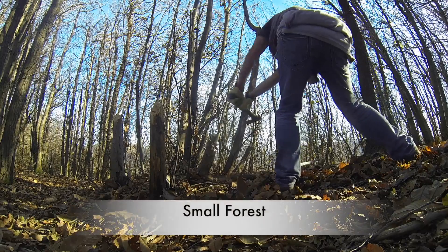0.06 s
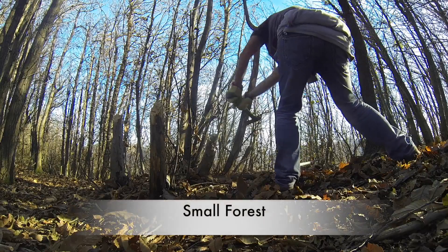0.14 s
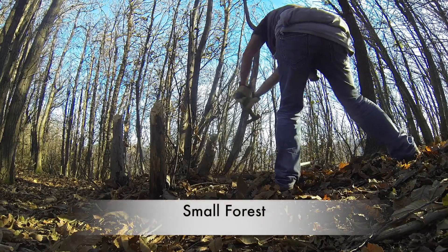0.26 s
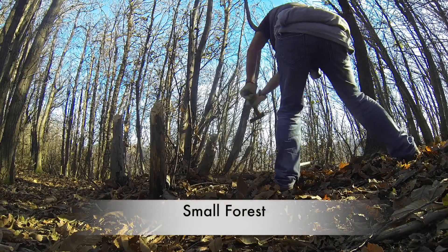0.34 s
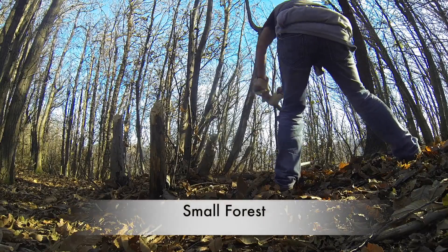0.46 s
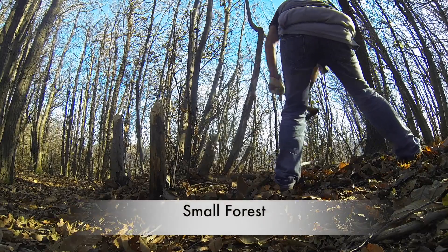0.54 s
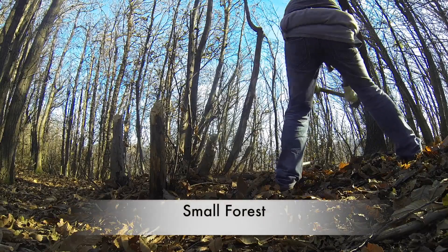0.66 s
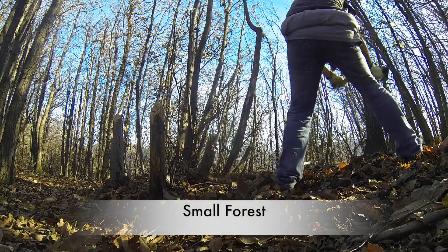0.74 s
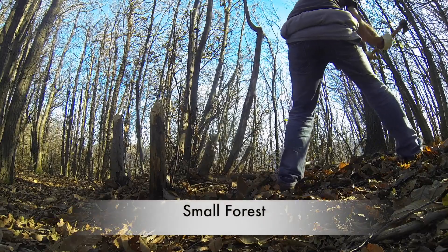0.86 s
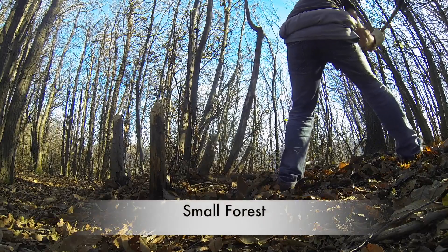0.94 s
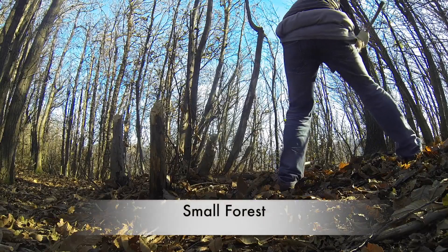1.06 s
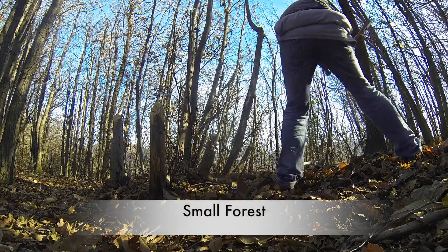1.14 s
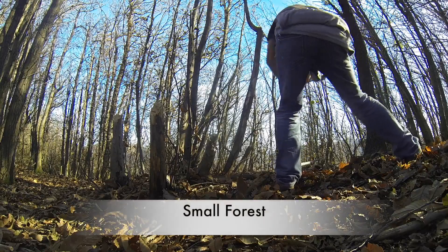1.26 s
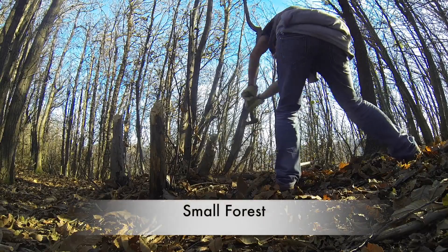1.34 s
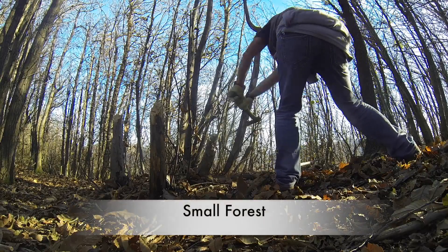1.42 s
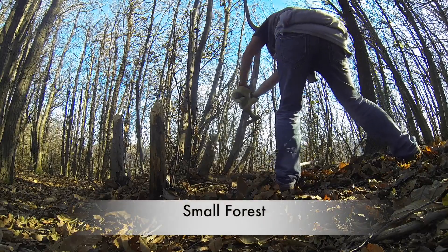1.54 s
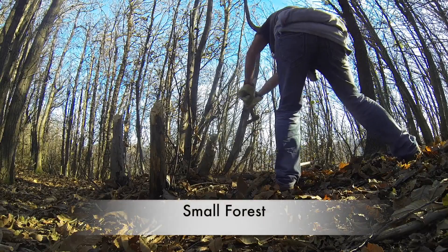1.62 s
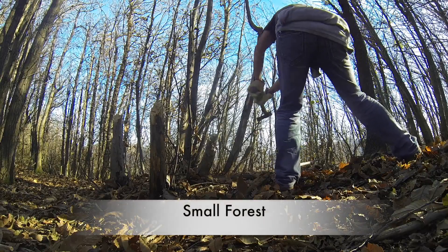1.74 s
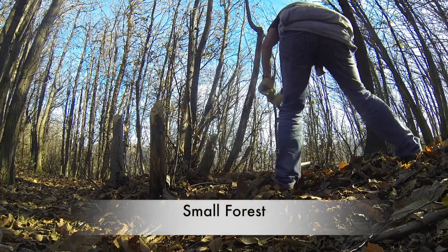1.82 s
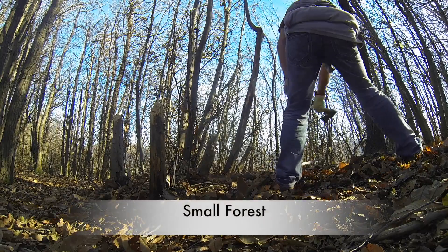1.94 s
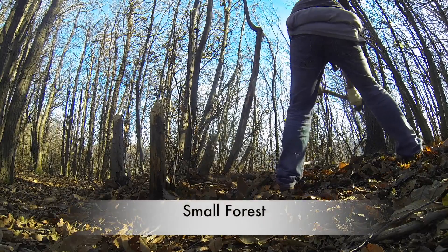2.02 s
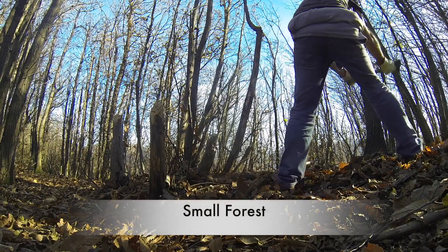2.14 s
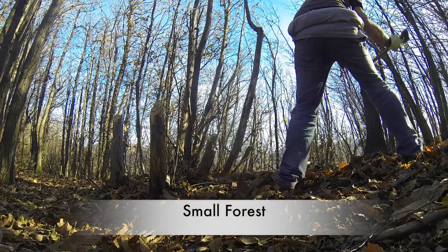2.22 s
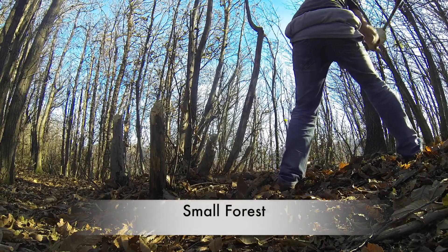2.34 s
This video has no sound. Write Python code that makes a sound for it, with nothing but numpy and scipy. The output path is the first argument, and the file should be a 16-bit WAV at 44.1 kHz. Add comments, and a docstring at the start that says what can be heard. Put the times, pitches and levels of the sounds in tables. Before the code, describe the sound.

An axe strikes a thin trunk twice, woody cracks with low thumps, leaves rustling in quiet woods

```python
"""Axe blows in a quiet wood

Two axe blows hit a thin standing trunk a few metres away. Each is a short woody crack (fading tones
and noise), then a low thump of trunk and roots with a rebound, and noise scattered by the trees.
Around them dry leaves rustle (swelling noise full of tiny clicks) and snap (short noise bursts)
under shifting feet, and wood is faintly knocked. Below lie a low rumble, a hiss and a thin whine."""
import sys
import numpy as np
from scipy import signal
from scipy.fft import rfft, irfft, next_fast_len
from scipy.io import wavfile
from scipy.ndimage import map_coordinates

SR = 44100
rng = np.random.default_rng(int(sys.argv[2]) if len(sys.argv) > 2 else 0)


def amplitude_ratio(level_db):
    """Convert a level in decibels to the matching linear amplitude (field) ratio."""
    exponent = np.asarray(level_db, float) / 20
    return 10 ** exponent


def bounce(signal):
    """Save signal as a 16-bit WAV file at the path given by the first command-line argument."""
    frames = np.transpose(np.atleast_2d(signal))
    limited = np.clip(frames, -1, 1)
    pcm = np.round(limited * 32767).astype(np.int16)
    wavfile.write(sys.argv[1], SR, pcm)


N = 105840  # length of the scene in samples (2.4 s)

# Colours of the distant rumble and the air hiss: (frequency [Hz], relative level [dB per Hz])
RUMBLE_COLOUR = [(12, -32), (20, 13), (38, -1.5), (71, 3), (119, -8), (195, -4.5), (251, -10.5),
                 (369, -19.5), (700, -32.5), (910, -30.5), (1540, -120)]
HISS_COLOUR = [(240, -44), (400, 2), (536, -6.5), (1010, -3), (1420, -8.5), (5190, -13.5), (9040, -12),
               (13100, -20), (14600, -14), (16000, -56)]
RUMBLE_DB, HISS_DB = -49, -63.5  # levels before the microphone
WHINE_HZ, WHINE_DB = 14100, -79  # a very narrow band of noise, level before the microphone

# Feet shifting in the leaves:
# (time of peak [s], treble level [dB], lower part over the treble [dB], rise [s], fall [s])
SHIFTS = [(.14, -71, -2, 0.07, 0.076), (0.329, -59, 5.5, 0.024, 0.047), (.46, -61.5, -2, 0.032, 0.06),
          (.56, -65, -1.5, .03, 0.047), (0.634, -52.5, -1, 0.022, 0.018),
          (0.671, -50.5, -1.5, 0.011, 0.036), (0.779, -57.5, -2, 0.063, 0.077),
          (.94, -64, -3, 0.061, 0.062), (1.07, -56.5, -5.5, 0.038, 0.026), (1.40, -70, -5, 0.028, 0.093),
          (1.60, -53.5, -10, 0.088, 0.063), (1.745, -61.5, 3, 0.025, 0.014), (1.86, -58, 1, 0.016, 0.12),
          (2.025, -55, -1, 0.027, 0.072), (2.2, -62.5, -0.5, 0.075, 0.052), (2.31, -69, -1.5, 0.027, 0.055)]
# Colours of the treble and the lower part of the rustle: (frequency [Hz], relative level [dB per Hz])
LEAF_HIGH_COLOUR = [(2060, -8), (3500, -25), (5430, -3), (7040, 5), (9870, -0.5), (14500, -24),
                    (15600, -47), (16000, -62)]
LEAF_LOW_COLOUR = [(210, -42), (350, -4.5), (624, -17), (1260, -14.5), (1490, -16), (5000, -19),
                   (6500, -68), (11000, -120)]
STIR_DB = -70  # the leaves between the shifts
GRAINS_PER_S, GRAIN_SPREAD_DB, GRAIN_DB = 1500, 2.5, -2  # average rate, spread, level over the noise

# Snaps of leaves and twigs:
# (time [s], relative level [dB], centre frequency [Hz], width [octaves], length [s])
SNAPS = [(0.209, -20, 7400, .5, .002), (0.321, -39, 7500, 1, 0.0064), (.423, -39.5, 8030, .9, .002),
         (.4443, -49.5, 2640, 0.95, 0.0091), (0.558, -45, 7000, 0.55, 0.0035),
         (0.649, -42, 5000, 2.2, 0.0045), (0.665, -39, 5000, 4.2, 0.0089),
         (0.7703, -36.5, 4320, 0.65, 0.003), (0.77, -37.5, 8300, 0.42, 0.0042),
         (0.8684, -50, 2360, 1.1, 0.0028), (.9846, -46.5, 9100, 0.46, 0.0033),
         (1.053, -51.5, 8000, 0.64, 0.0035), (1.080, -43.5, 9000, 0.56, 0.003),
         (1.2714, -48, 1530, 0.94, 0.0033), (1.272, -48, 8450, .5, 0.0046), (1.5325, -23, 7000, .3, .002),
         (1.495, -46, 1500, .8, 0.0035), (1.62, -40, 1190, 1.8, 0.012), (1.722, -52, 7950, 0.51, 0.0028),
         (1.747, -51, 8780, .8, .004), (1.954, -46, 8300, .8, .005), (2.103, -39, 7250, 0.77, 0.0047),
         (2.1024, -44.5, 2800, 0.69, .006), (2.137, -50, 2000, 1.5, 0.0022),
         (2.1966, -49, 1700, 0.68, 0.0026), (2.231, -45.5, 1190, 1.7, 0.0029),
         (2.283, -47.5, 3500, 0.7, 0.0024), (2.322, -53, 2400, .6, 0.0075)]

# A faint double knock on wood, each contact: (time [s], level [dB])
KNOCKS = [(1.0657, -42.5), (1.069, -59), (1.078, -42.5), (1.0806, -48)]
# The tones that the knocked wood rings with: (frequency [Hz], level [dB], time to fade by 60 dB [s])
KNOCK_WOOD = [(294, -1, 0.075), (909, 0, 0.045), (1340, -4.5, 0.034), (1710, -2.5, 0.038),
              (2685, 1.5, 0.018)]

# Axe blows: (time [s], level of the blow [dB], splinter noise over it [dB], thump over it [dB],
# delay of the rebound [s], rebound over the thump [dB])
BLOWS = [(.1888, -2.5, -2.5, -7.5, .106, -12), (1.5180, -3.5, 0, -7, .108, -14.5)]
# Tones of wood and blade at the cut: (frequency [Hz], level in first blow [dB],
# level in second blow [dB], rise [s], time to fade by 60 dB [s])
CUT_TONES = [(587, -19.5, -8.5, 0.0033, .06), (864, -11.5, -11.5, .003, .05),
             (1147, 7, -20.5, 0.0032, 0.029), (1935, 10, 0, 0.00069, 0.011),
             (2442, -5.5, -4.5, 0.0013, .016), (3114, -1.5, -2.5, 0.001385, 0.02),
             (4270, -19, -8.5, 0.0013, 0.012), (5840, -23.5, -23.5, 0.0018, 0.048),
             (6850, -19, -4.5, 0.0014, 0.017), (7750, 16, -9, .003, 0.0091),
             (8700, -2.5, -9.5, 0.0016, 0.016)]
# Tones of trunk and roots: (frequency [Hz], level in first blow [dB], level in second blow [dB],
# time to fade by 60 dB [s])
TRUNK_TONES = [(68.3, -4.5, -3, 0.2), (94.83, -12.5, -14, 0.75), (134.8, -8, -4.5, .25),
               (169, -9.5, -3.5, 0.079), (229.3, -9, -11, .2), (316.6, -7.5, -6, 0.095),
               (394, -18.5, -17.5, 0.14), (566, -17, -17.5, 0.11)]
# Colour of the tearing fibres: (frequency [Hz], relative level [dB per Hz])
SPLINTER_COLOUR = [(290, -35.5), (500, -11), (649, -6.5), (1180, -2.5), (1440, -17), (1870, -4),
                   (2690, -11.5), (3110, -9), (5240, -18.5), (7860, -13.5), (9920, -15), (16000, -53.5)]
SPLINTER_RISE_S, SPLINTER_T60_S = 0.00074, 0.029
# How long the sound scattered by the trees lasts: (frequency [Hz], time to fade by 60 dB [s])
TREE_FADES = [(300, 0.21), (1000, 0.31), (3000, 0.32), (8000, 0.3), (14000, 0.14)]
# Colour of the scattered sound: (frequency [Hz], relative level [dB per Hz])
SCATTER_COLOUR = [(180, -16), (300, -2), (360, -2), (774, -19), (1170, -11), (1930, -20), (7440, -22),
                  (13300, -37.5), (16000, -78.5)]
TREES_DB = -23  # over the blow
THUMP_LAG_S, THUMP_RISE_S = 0.0078, 0.0006
SHUDDER_DB, SHUDDER_T60_S = -19, 0.41  # level over the thump
PUSH_DB, PUSH_WIDTH_S = 4, 0.0013  # the trunk's first jolt, level over the thump

MIC_LOW_HZ, MIC_HIGH_HZ = 48, 11500


def unit(x):
    """Scale a sound to an rms (average strength) of 1."""
    return x / np.sqrt(np.mean(x ** 2) + 1e-20)


def along(points, hz):
    """Read a curve of (frequency [Hz], value) points, joined on a log frequency axis."""
    f, v = np.transpose(points)
    return np.interp(np.log(hz + 1), np.log(f + 1), v)


def coloured(x, spectrum):
    """Shape a sound with a (frequency [Hz], level [dB]) curve, then scale it to rms 1."""
    size = next_fast_len(len(x) + 4096)
    gain = amplitude_ratio(along(spectrum, np.fft.rfftfreq(size, 1 / SR)))
    return unit(irfft(rfft(x, size) * gain, size)[:len(x)])


def noise(length, spectrum):
    """Steady noise of the given colour, rms 1."""
    return coloured(rng.standard_normal(length), spectrum)


def wobble(rate):
    """A smooth random curve with this many random points a second."""
    knots = rng.standard_normal(int(N * rate / SR) + 4)
    return map_coordinates(knots, [np.arange(N) * rate / SR])


def swell(t, rise, t60):
    """A loudness curve that rises, then fades by 60 dB every t60 seconds; silent before zero."""
    t = np.maximum(t, 0)
    return (1 - np.exp(-t / rise)) ** 2 * amplitude_ratio(-60 * t / t60)


def add(out, s, x):
    """Mix x into out, starting at s seconds."""
    part = out[round(s * SR):][:len(x)]
    part += x[:len(part)]


def forest():
    """The quiet wood: a slowly wavering distant rumble, air hiss and a thin high whine, all noise."""
    rumble = amplitude_ratio(RUMBLE_DB + 1.3 * wobble(3.4)) * noise(N, RUMBLE_COLOUR)
    hiss = amplitude_ratio(HISS_DB) * noise(N, HISS_COLOUR)
    narrow = [(WHINE_HZ - 150, -60), (WHINE_HZ, 0), (WHINE_HZ + 150, -60)]
    whine = amplitude_ratio(WHINE_DB) * noise(N, narrow)
    return rumble + hiss + whine


def crackling_noise():
    """Smooth noise plus many tiny clicks of random strength, as from dry leaves rubbing."""
    clicks = (rng.random(N) < GRAINS_PER_S / SR) * rng.standard_normal(N)
    clicks = clicks * amplitude_ratio(GRAIN_SPREAD_DB * rng.exponential(size=N))
    return rng.standard_normal(N) + amplitude_ratio(GRAIN_DB) * unit(clicks)


def leaves():
    """Leaves rub and crackle: noise and clicks in two bands swell with each shift of the feet."""
    t = np.arange(N) / SR
    bumps = []
    for s, db, _, rise, fall in SHIFTS:
        width = np.where(t < s, rise, fall)
        bumps.append(amplitude_ratio(db) * np.exp(-((t - s) / width) ** 2))
    bumps = np.array(bumps)
    lower = amplitude_ratio([row[2] for row in SHIFTS])
    high_level = (amplitude_ratio(STIR_DB) + bumps.sum(axis=0)) * amplitude_ratio(2.8 * wobble(64))
    low_level = (amplitude_ratio(STIR_DB) + lower @ bumps) * amplitude_ratio(1.5 * wobble(50))
    high = high_level * coloured(crackling_noise(), LEAF_HIGH_COLOUR)
    low = low_level * coloured(crackling_noise(), LEAF_LOW_COLOUR)
    return high + low


def snaps():
    """Leaves and twigs break suddenly: short noise bursts around a centre frequency."""
    out, t = np.zeros(N), np.arange(2048) / SR
    for s, db, hz, octaves, length in SNAPS:
        # one width away from the centre the noise is 12 dB weaker
        band = [(min(hz * 2 ** (octaves * u), 21000), -12 * u * u) for u in (-3, -2, -1, 0, 1, 2, 3)]
        shape = (1 - np.exp(-t / 0.0006)) * np.exp(-(t / length) ** 2)
        add(out, s, amplitude_ratio(db - 1.5) * noise(len(t), band) * shape)
    return out


def knock():
    """Light contacts ring a small piece of wood: fading tones, each a little stronger or weaker."""
    out, t = np.zeros(N), np.arange(SR // 8) / SR
    for s, db in KNOCKS:
        for hz, level, t60 in KNOCK_WOOD:
            strength = amplitude_ratio(db + level + rng.normal(0, 2.1))
            add(out, s, strength * swell(t, 0.00034, t60) * np.sin(2 * np.pi * hz * t))
    return out


def crack(t, k, splinter_db):
    """The blade makes the cut ring in fading tones and tears fibres, a short burst of noise."""
    out = amplitude_ratio(splinter_db) * swell(t, SPLINTER_RISE_S, SPLINTER_T60_S) * noise(len(t), SPLINTER_COLOUR)
    for hz, *levels, rise, t60 in CUT_TONES:
        out -= amplitude_ratio(levels[k]) * swell(t, rise, t60) * np.sin(2 * np.pi * hz * t)
    return out


def thump(t, k, again_s, again_db):
    """Trunk and roots are jolted, ring in low tones, ring again on the rebound, and shudder as noise."""
    # the jolt is a dip in pressure just before the trunk rings
    out = -amplitude_ratio(PUSH_DB) * np.exp(-((t - THUMP_LAG_S) / PUSH_WIDTH_S + 0.64) ** 2)
    for hz, *levels, t60 in TRUNK_TONES:
        for lag, gain_db in [(THUMP_LAG_S, 0), (again_s, again_db)]:
            ring = swell(t - lag, THUMP_RISE_S, t60) * np.sin(2 * np.pi * hz * (t - lag))
            out += amplitude_ratio(levels[k] + gain_db) * ring
    # the shudder takes its colour from the trunk tones
    low = [(30, -120)] + [(row[0], row[1 + k]) for row in TRUNK_TONES] + [(700, -31), (1500, -120)]
    return out + amplitude_ratio(SHUDDER_DB) * swell(t, 0.01, SHUDDER_T60_S) * noise(len(t), low)


def trees(t):
    """Trees scatter the crack into a tail: noise that fades at its own speed at each frequency."""
    hz, times, bands = signal.stft(noise(len(t), SCATTER_COLOUR), SR, nperseg=128)
    fade = amplitude_ratio(-60 * times / along(TREE_FADES, hz)[:, None])
    tail = signal.istft(bands * fade, SR, nperseg=128)[1][:len(t)]
    return tail * (1 - np.exp(-t / 0.0013))


def axe():
    """Each blow is a crack at the cut, a thump of the trunk and a tail scattered by the trees."""
    out, t = np.zeros(N), np.arange(int(0.8 * SR)) / SR
    for k, (s, db, splinter_db, thump_db, again_s, again_db) in enumerate(BLOWS):
        blow = crack(t, k, splinter_db)
        blow = blow + amplitude_ratio(thump_db) * thump(t, k, again_s, again_db)
        blow = blow + amplitude_ratio(TREES_DB) * trees(t)
        add(out, s, amplitude_ratio(db) * blow)
    return out


def scene():
    """All sources added together at one microphone."""
    return (forest() + leaves() + snaps() + knock() + axe())[None]


def low_pass(x):
    """Removes everything above the highest recorded frequency."""
    return signal.sosfilt(signal.butter(12, 16520, fs=SR, output="sos"), x)


def record(dry):
    """The microphone loses deep bass and top treble, and peaks are rounded off below full scale."""
    low_cut = signal.butter(N=2, Wn=MIC_LOW_HZ, btype="high", fs=SR, output="sos")
    high_cut = signal.butter(N=2, Wn=MIC_HIGH_HZ, fs=SR, output="sos")
    heard = signal.sosfilt(high_cut, signal.sosfilt(low_cut, dry))
    mix = heard / (1 + np.abs(heard) ** 6) ** (1 / 6)
    return low_pass(mix)


dry = scene()
out = record(dry)
bounce(out)
```